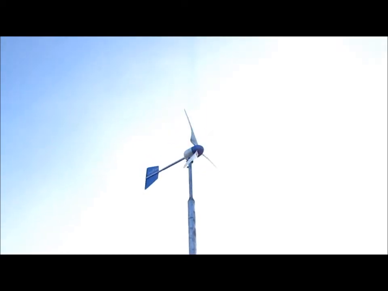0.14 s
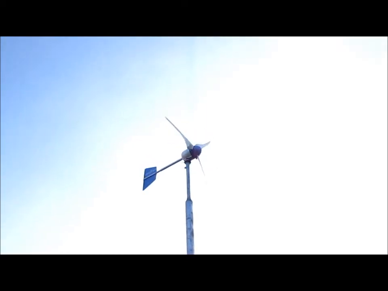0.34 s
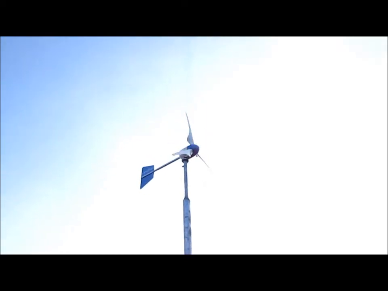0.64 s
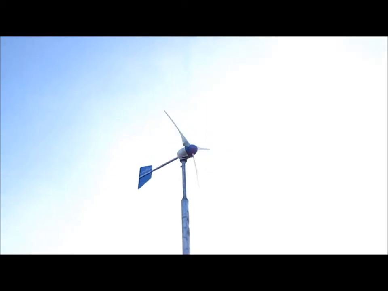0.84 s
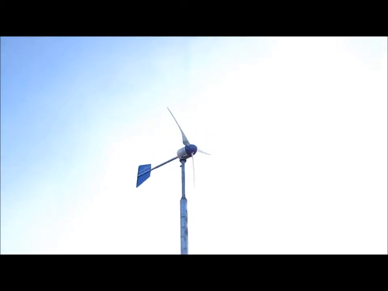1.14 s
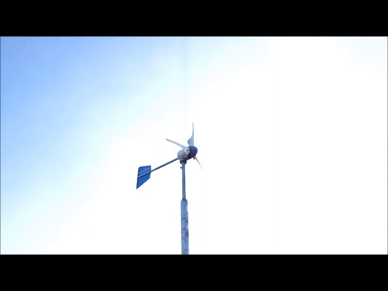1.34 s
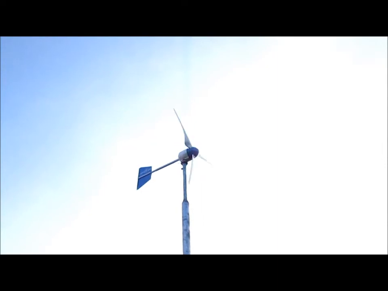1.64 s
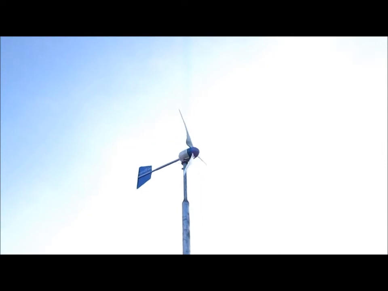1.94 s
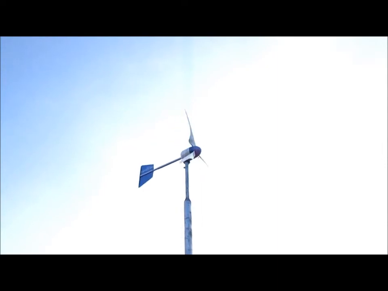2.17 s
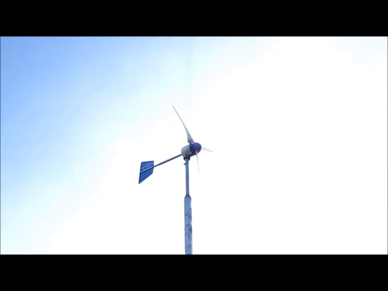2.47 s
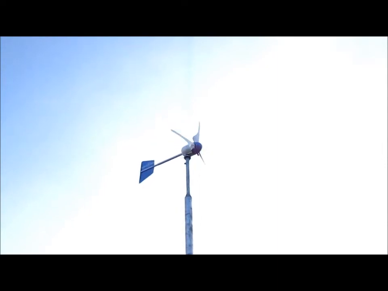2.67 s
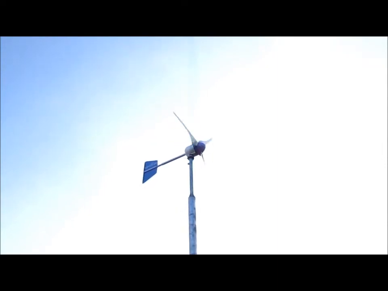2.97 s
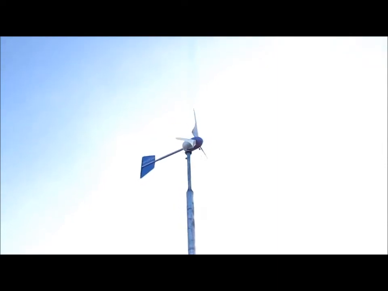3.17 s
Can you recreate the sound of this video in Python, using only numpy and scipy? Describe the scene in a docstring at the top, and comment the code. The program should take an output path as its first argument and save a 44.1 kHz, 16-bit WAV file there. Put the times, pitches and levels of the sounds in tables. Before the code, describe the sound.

Wind noise batters an unshielded microphone outdoors, deep and ragged, with sputtering flutters and small snaps

```python
"""Gusty wind buffets an unshielded microphone below a small wind turbine.
The buffeting is a frozen pattern of eddies, a noise table read at a jerky air speed, over a slower rumble.
Tight eddies are short tone bursts that rise in pitch; snaps are sharp-cornered pulses at listed times.
Blades and air behind them are coloured noise whose level swells and dips.
A soft limiter holds the peaks, electronic hiss is added and the extreme treble is cut."""
import sys
import numpy as np
from scipy import signal
from scipy.fft import rfft, irfft
from scipy.io import wavfile
from scipy.ndimage import uniform_filter1d, minimum_filter1d, map_coordinates

SR = 44100
rng = np.random.default_rng(int(sys.argv[2]) if len(sys.argv) > 2 else 0)


def output_pcm(signal):
    """Save a mono or channel-first signal as 16-bit PCM at the path in sys.argv[1].

    Samples are clipped to [-1, 1] before scaling.
    """
    pcm = np.clip(np.atleast_2d(signal).T, -1, 1) * 32767
    wavfile.write(sys.argv[1], SR, np.round(pcm).astype(np.int16))


N = 145971

# Sharp pressure breaks. Each row: time in seconds, peak level in dB of the part above SNAP_EDGE_HZ.
SNAP_EVENTS = [(0.0942, -35), (0.138, -36.5), (0.3806, -31), (0.4499, -32), (0.8655, -32.5),
               (0.9414, -33.5), (1.2391, -32), (1.3424, -27), (1.421, -40), (1.5829, -32), (1.8274, -31),
               (1.8572, -33.5), (2.3587, -22), (2.5561, -18.5), (2.6145, -37), (2.633, -38), (2.664, -44),
               (2.7267, -37), (2.7584, -36.5), (2.796, -24.5), (3.0633, -34), (3.2028, -35)]
SNAP_EDGE_HZ = 1800
SNAP_LAG_S = .0015  # from the listed time to the corner


def undb(db):
    """Decibels are a logarithm of amplitude: 20 dB is a factor of ten."""
    return 10 ** (np.asarray(db) / 20)


def noise(colour, count):
    """Spectral shaping: white noise weighted by a (Hz, dB) curve, then scaled to rms 1."""
    hz, db = np.array(colour, float).T
    f = np.maximum(np.arange(count // 2 + 1) * SR / count, 1)
    weight = undb(np.interp(np.log(f), np.log(hz), db, left=-99))
    x = irfft(rfft(rng.standard_normal(count)) * weight, count)
    return x / x.std()


def walk(rate):
    """Low-passed randomness: a smooth curve of spread 1 that changes about rate times a second."""
    f = np.arange(N // 2 + 1) * SR / N
    x = irfft(rfft(rng.standard_normal(N)) / (1 + (f / rate) ** 2) ** 2, N)
    return x / x.std()


def hiss(t):
    """Broadband turbulence noise: blades and air give a coloured hiss; its level swells and dips, and several
    dips fall just after snaps."""
    # Spectrum of the hiss. Each row: frequency in Hz, relative level in dB.
    hiss_colour = [(250, -19.5), (600, 6.5), (1200, 6), (2240, 4), (2860, 7), (3780, 2.5), (4550, 2.5),
                   (6210, -5.5), (9000, -22), (11700, -60), (19800, -120)]
    # Swells and dips of the hiss. Each row: time in seconds, level in dB.
    hiss_level = [(0, -59), (.1, -55.5), (.2, -56), (.25, -56.5), (.4, -51), (.46, -56), (.55, -52),
                  (.65, -49.5), (.7, -54.5), (.8, -52), (.92, -52.5), (.96, -58), (1.15, -47.5),
                  (1.25, -53.5), (1.33, -52), (1.37, -54), (1.5, -48.5), (1.58, -53.5), (1.6, -57),
                  (1.7, -49.5), (1.81, -48.5), (1.84, -57), (2.0, -53.5), (2.07, -53.5), (2.17, -49.5),
                  (2.35, -47.5), (2.37, -58.5), (2.43, -52.5), (2.53, -46.5), (2.57, -56), (2.72, -55),
                  (2.8, -60), (2.83, -59.5), (3.0, -52), (3.06, -50), (3.08, -56.5), (3.2, -51),
                  (3.31, -50)]
    flicker_db, flicker_rate = 1.65, 17  # spread, changes per second
    level_db = np.interp(t, *np.array(hiss_level).T) + flicker_db * walk(flicker_rate)
    return noise(hiss_colour, count=N) * undb(level_db)


def snaps():
    """Impulse response: each snap is one growing oscillation that breaks off at a sharp corner."""
    snap_hz, corner_phase = 1350, 0.22  # phase in radians; it sharpens the corner
    rise_s, fall_s, top_hz = 0.00018, 0.00012, 7000
    u = np.arange(-400, 401) / SR
    envelope = np.exp(np.where(u < 0, u / rise_s, -u / fall_s))
    shape = envelope * np.sin(2 * np.pi * snap_hz * u + corner_phase)
    shape = signal.sosfilt(signal.butter(2, top_hz, fs=SR, output="sos"), shape)
    # the treble part alone sets the pulse to a peak of 1
    edge_filter = signal.butter(4, SNAP_EDGE_HZ, "high", fs=SR, output="sos")
    shape /= np.abs(signal.sosfiltfilt(edge_filter, shape)).max()
    hits = np.zeros(N)
    signs = np.sign(rng.standard_normal(len(SNAP_EVENTS)))
    for (s, db), sign in zip(SNAP_EVENTS, signs):
        hits[int((s + SNAP_LAG_S) * SR)] = sign * undb(db)
    return signal.fftconvolve(hits, shape, "same")


def whip(out_s, rows):
    """Frequency glide: a few cycles swell and fade while rising in pitch, for each (s, dB, Hz)."""
    width_cycles, glide_oct = 1.124, 0.26  # time unit in cycles, octaves of rise per time unit
    out = np.zeros(N)
    turns = rng.random(len(rows))  # random starting phases
    for (s, db, hz), turn in zip(rows, turns):
        near = slice(max(int((s - .03) * SR), 0), int((s + .03) * SR))
        u = np.clip((out_s[near] - s) * hz / width_cycles, -3, 3)
        # integral of the exponentially rising pitch
        cycles = width_cycles * (2 ** (glide_oct * u) - 1) / (glide_oct * np.log(2))
        out[near] += undb(db) * np.exp(-4 * u ** 2) * np.sin(2 * np.pi * (cycles + turn))
    return out


def whips(t):
    """Vortex tones: each tight eddy is a quick core inside a wider, slower swirl."""
    # Tight eddy cores. Each row: time in seconds, peak level in dB, pitch in Hz at the peak.
    cores = [(0.0075, -16.5, 920), (0.0184, -30, 859), (0.0275, -24, 959), (0.035, -16, 741),
             (0.0457, -14, 766), (0.055, -32, 816), (0.0705, -16.5, 807), (0.0819, -19.5, 950),
             (0.095, -19, 840), (0.125, -35, 923), (0.1394, -16, 835), (0.1576, -16.5, 981),
             (0.1764, -15, 770), (0.2054, -15, 905), (0.2183, -18.5, 1050), (0.2241, -23, 860),
             (0.2559, -13.5, 774), (0.2614, -24, 983), (0.2683, -19.5, 924), (0.2805, -21, 807),
             (0.3208, -14.5, 950), (0.3253, -18.5, 945), (0.3573, -19, 710), (0.3679, -10, 676),
             (0.3818, -12, 790), (0.3974, -13, 713), (0.4116, -14.5, 886), (0.4246, -13.5, 810),
             (0.4305, -24, 776), (0.4522, -14.5, 740), (0.4774, -21, 866), (0.5149, -22, 773),
             (0.5442, -14, 770), (0.5721, -15.5, 750), (0.5815, -21, 780), (0.6016, -31, 786),
             (0.6093, -16.5, 730), (0.6398, -19, 666), (0.6526, -16.5, 796), (0.6743, -21, 1039),
             (0.6963, -16, 653), (0.7081, -15.5, 770), (0.7464, -24, 835), (0.7707, -22, 722),
             (0.8117, -14, 840), (0.821, -11, 838), (0.8282, -23, 810), (0.841, -23, 770),
             (0.8562, -28, 931), (0.8658, -17, 802), (0.875, -22, 800), (0.889, -23, 824),
             (0.9039, -11, 687), (0.9207, -16, 780), (0.9304, -30, 950), (0.9441, -24, 1008),
             (0.9536, -28, 931), (0.9645, -27, 790), (0.9904, -21, 870), (1.0055, -21.5, 685),
             (1.0585, -23, 714), (1.0817, -18.5, 723), (1.1163, -28, 794), (1.1945, -16, 743),
             (1.2007, -22, 1056), (1.2111, -14.5, 884), (1.2176, -19, 794), (1.2402, -13, 860),
             (1.2848, -10, 710), (1.302, -13.5, 900), (1.3453, -8, 800), (1.3693, -26, 716),
             (1.3765, -21, 667), (1.4073, -22, 742), (1.4221, -22, 665), (1.455, -16, 790),
             (1.4602, -13.5, 990), (1.4749, -28, 793), (1.512, -18, 810), (1.5248, -18, 765),
             (1.5329, -21, 910), (1.5461, -13, 644), (1.5834, -11, 730), (1.6178, -21, 719),
             (1.6729, -24, 750), (1.6977, -14, 720), (1.7059, -17, 820), (1.7227, -11, 716),
             (1.7656, -23, 739), (1.7935, -17, 912), (1.7993, -17, 730), (1.8307, -11, 810),
             (1.8354, -25, 833), (1.8595, -10.5, 880), (1.8642, -21, 976), (1.8725, -15, 950),
             (1.8917, -19, 884), (1.8996, -14, 729), (1.9168, -14.5, 780), (1.9458, -27, 870),
             (1.9601, -8, 794), (1.967, -18, 746), (1.9876, -26, 910), (2.0068, -16.5, 755),
             (2.0153, -16.5, 669), (2.079, -15.5, 1000), (2.0918, -22, 759), (2.1118, -14, 890),
             (2.164, -21.5, 805), (2.1866, -16.5, 814), (2.1982, -17, 650), (2.2112, -18, 708),
             (2.2353, -25, 826), (2.291, -26, 1019), (2.3116, -22, 805), (2.35, -14.5, 654),
             (2.36, -10.5, 1110), (2.4085, -23, 669), (2.438, -24, 716), (2.4926, -19, 700),
             (2.5115, -18.5, 719), (2.5189, -19, 830), (2.5439, -19, 936), (2.5573, -5.5, 1135),
             (2.5718, -10, 700), (2.5845, -15, 1063), (2.5936, -18, 923), (2.6114, -14, 950),
             (2.624, -23, 871), (2.6361, -18, 1052), (2.648, -22, 975), (2.6569, -12, 820),
             (2.6656, -13.5, 1107), (2.6708, -20, 911), (2.6754, -22, 1002), (2.7024, -14.5, 973),
             (2.7112, -17.5, 842), (2.7266, -23, 929), (2.7375, -16.5, 770), (2.75, -20, 817),
             (2.7593, -12, 725), (2.7763, -24, 1020), (2.7821, -18, 956), (2.788, -16, 1050),
             (2.7971, -11, 1140), (2.8055, -16, 877), (2.812, -17, 860), (2.8525, -25, 880),
             (2.8584, -15, 760), (2.8652, -16.5, 800), (2.8788, -23, 677), (2.8999, -20, 673),
             (2.9174, -21, 707), (2.9236, -18, 720), (2.9489, -21, 745), (2.976, -28, 849),
             (3.0113, -22, 737), (3.0265, -14.5, 832), (3.0662, -17, 960), (3.075, -24.5, 786),
             (3.0877, -20, 790), (3.12, -30, 878), (3.1787, -18, 704), (3.1903, -17.5, 1030),
             (3.2066, -12.5, 959), (3.2107, -13, 927), (3.232, -15, 694), (3.24, -17.5, 735),
             (3.2505, -10, 724), (3.2931, -14.5, 790)]
    lag_s = -0.00028
    swirl_pitch_ratio, swirl_db = 0.47, -0.5  # relative to the core
    swirls = [(s, db + swirl_db, hz * swirl_pitch_ratio) for s, db, hz in cores]
    return whip(t - lag_s, cores) + whip(t - lag_s, swirls)


def buffet(t):
    """Frozen turbulence: air speed turns the eddy pattern into sound, over a rumble; both follow the gusts."""
    # Gusts, in consecutive groups. Each row: time in seconds, level in dB,
    # brightness in dB (treble over bass, rising with air speed).
    gusts = [
        [(0.0, -14, -5.5), (0.014, -25, -8), (0.09, -24.5, -12), (0.168, -19.5, -14), (0.206, -26.5, -1),
         (0.24, -12.5, -34.5), (0.25, -17, -6), (0.314, -33, -4), (0.342, -19.5, -16), (0.41, -16.5, -12),
         (0.478, -25, -7), (0.492, -20, -31), (0.52, -35, -3), (0.538, -20.5, -14), (0.612, -21.5, -7),
         (0.628, -23, -28.5), (0.65, -21.5, -1), (0.66, -15.5, -28), (0.714, -18, -9), (0.776, -27.5, -15),
         (0.78, -19.5, -32.5), (0.806, -19.5, -9), (0.87, -20, -11), (0.898, -29.5, 2.5), (0.916, -15.5, -12.5),
         (0.99, -23, -12), (1.03, -31.5, -18), (1.055, -25, -12), (1.07, -37, -11.5), (1.082, -24.5, -4.5),
         (1.098, -18, -38.5), (1.114, -35, -2), (1.14, -35, -21.5)],
        [(1.14, -37.5, -15), (1.162, -31, -12), (1.188, -13.5, -17), (1.24, -21, -10), (1.27, -25, -30.5),
         (1.284, -22.5, 0), (1.326, -22.5, -28), (1.348, -15.5, -1.5), (1.356, -21.5, -23), (1.404, -30, -10),
         (1.434, -21, -15), (1.5, -17, -20), (1.558, -15.5, -18), (1.576, -24.5, -6.5), (1.616, -21, -16),
         (1.624, -40, -30), (1.662, -42, -30), (1.673, -21, -22), (1.69, -32, -26), (1.706, -14, -11),
         (1.754, -34, -23), (1.77, -10, -29), (1.805, -26, -20), (1.825, -16, -22.5), (1.866, -25.5, -4),
         (1.942, -18.5, -16), (2.02, -26, -9.5), (2.028, -26, -20), (2.09, -18, -15), (2.17, -23, -15),
         (2.19, -17, -17), (2.23, -18.5, -15), (2.258, -29, -21), (2.292, -15.5, -18.5), (2.338, -27.5, -26.5),
         (2.356, -13, -5), (2.364, -29, -25), (2.378, -28.5, -22), (2.4, -28.5, -18), (2.452, -27, -15),
         (2.48, -20, -37)],
        [(2.48, -18, -35.5), (2.49, -18.5, -16), (2.542, -15, -12.5), (2.594, -22.5, -3), (2.604, -19.5, -13),
         (2.676, -22.5, -3), (2.688, -18, -34), (2.7, -22, -5.5), (2.72, -17.5, -14.5), (2.812, -24, -2),
         (2.832, -31.5, -23.5), (2.842, -30, -9), (2.875, -22.5, -8), (2.888, -31.5, -14.5), (2.92, -21, -14.5),
         (2.958, -21.5, -21), (2.99, -28, -19), (3.0, -25, -30), (3.026, -19, -1.5), (3.056, -22, -35.5),
         (3.066, -16.5, -14), (3.09, -37, 1), (3.108, -22.5, -26.5), (3.15, -36.5, -16.5), (3.164, -23.5, -24),
         (3.18, -13.5, -14), (3.256, -20, -6), (3.274, -21, -36), (3.288, -19, -8), (3.31, -22, -14.5)],
    ]
    # Eddy pattern at mean speed. Each row: frequency in Hz, relative level in dB.
    eddy_colour = [(30, -36.5), (60, -13), (120, -6.5), (250, -5.5), (400, -9.5), (600, -15.5), (900, -36),
                   (1500, -49.5), (3000, -130)]
    # Spectrum of the rumble. Each row: frequency in Hz, relative level in dB.
    rumble_colour = [(20, -11.5), (40, 4.5), (80, 11), (140, 8.5), (250, -2.5), (400, -57), (900, -110)]
    # Swell of the rumble. Each row: time in seconds, level change in dB.
    rumble_swell = [(0, -2.5), (.5, -2), (1.0, 0.5), (1.4, 0), (1.8, 2.5), (2.2, 1.5), (2.6, 2.5),
                    (3.0, 0.5), (3.31, -0.5)]
    mean_bright_db, db_per_octave = -14.5, 22  # brightness at mean speed, and per octave of speed
    jerk_oct, jerk_rate = .2, 81.36  # spread in octaves of speed, changes per second
    spurt_oct, spurt_rate = .3, 199.5
    top_speed_oct = .8  # soft bound on the speed swing
    flutter_db, flutter_rate = 5.5, 158
    buffet_db, rumble_db = 0.83, -4
    dart_db_per_oct = 4.5  # faster air presses harder
    eddy_bass_cut_hz = 84  # the low end is left to the rumble

    s, db, bright_db = np.vstack(gusts).T

    def smooth(v):
        """Moving average: the gust curve with its corners rounded."""
        return uniform_filter1d(uniform_filter1d(np.interp(t, s, v), size=88), size=88)

    level_db = smooth(db)
    jerks = jerk_oct * walk(jerk_rate)
    spurts = spurt_oct * (np.hypot(walk(spurt_rate), .3) - .8)
    darts = jerks + spurts  # brief darts of air
    octaves = (smooth(bright_db) - mean_bright_db) / db_per_octave + darts
    octaves = octaves / (1 + np.abs(octaves / top_speed_oct) ** 3) ** (1 / 3)
    # summed speed is the place reached in the pattern
    place = np.cumsum(2 ** octaves)
    eddies = map_coordinates(noise(eddy_colour, count=2 * N), [place], order=3, mode="wrap")
    eddies = eddies * undb(buffet_db + flutter_db * walk(flutter_rate) + dart_db_per_oct * darts)
    eddy_bass_cut = signal.butter(2, eddy_bass_cut_hz, "high", fs=SR, output="sos")
    eddies = signal.sosfilt(eddy_bass_cut, undb(level_db) * eddies)

    slow_db = uniform_filter1d(level_db, size=1500)
    swell_db = np.interp(t, *np.array(rumble_swell).T)
    rumble = undb(slow_db + rumble_db + swell_db) * noise(rumble_colour, count=N)
    return eddies + rumble


def scene():
    """Superposition: the pressures add, with the buffeting briefly weakened around each snap."""
    t = np.arange(N) / SR
    dip_depth, dip_s = 0.16, 0.0016
    dips = np.ones(N)
    for s, _ in SNAP_EVENTS:
        # the buffeting dips briefly so that the snap stands out
        dips *= 1 - dip_depth * np.exp(-((t - s - SNAP_LAG_S) / dip_s) ** 2)
    return (buffet(t) * dips + whips(t) + snaps() + hiss(t))[None]


def record(dry):
    """Gain reduction: a quick, soft limiter holds the peaks; then electronic hiss and a treble cut."""
    ceiling, knee = 0.49, 3.25  # full scale is 1; a higher knee bends more sharply
    self_noise_db, offset = -65.5, 0.01  # the offset is a constant shift
    top_hz = 15700
    gain = (1 + np.abs(dry / ceiling) ** knee) ** (-1 / knee)
    gain = minimum_filter1d(gain, size=221)  # hold each reduction for about 5 ms
    gain = uniform_filter1d(uniform_filter1d(gain, size=110), size=110)
    x = dry * gain + undb(self_noise_db) * rng.standard_normal(dry.shape) + offset
    return signal.sosfilt(signal.ellip(14, .2, 80, top_hz, fs=SR, output="sos"), x)


dry = scene()
out = record(dry)
output_pcm(out)
```